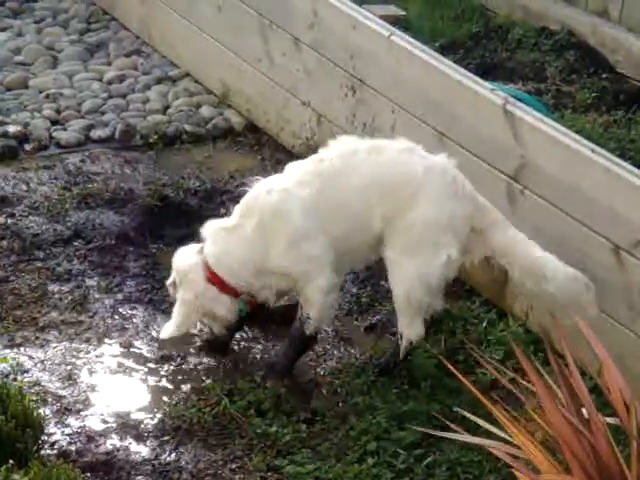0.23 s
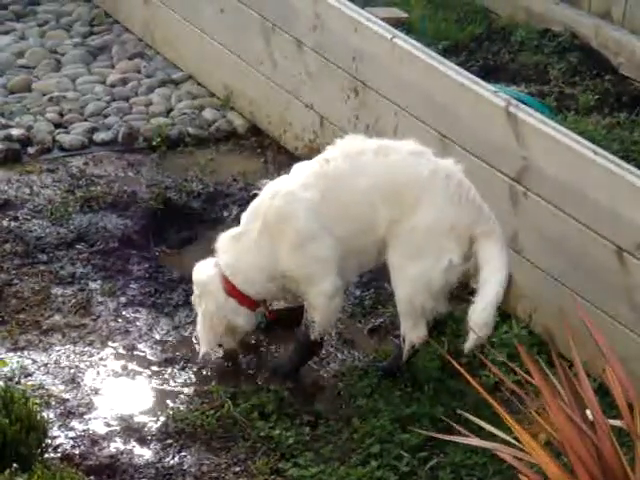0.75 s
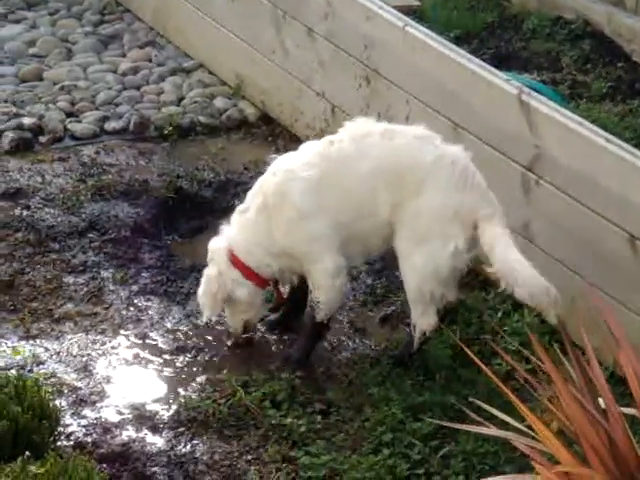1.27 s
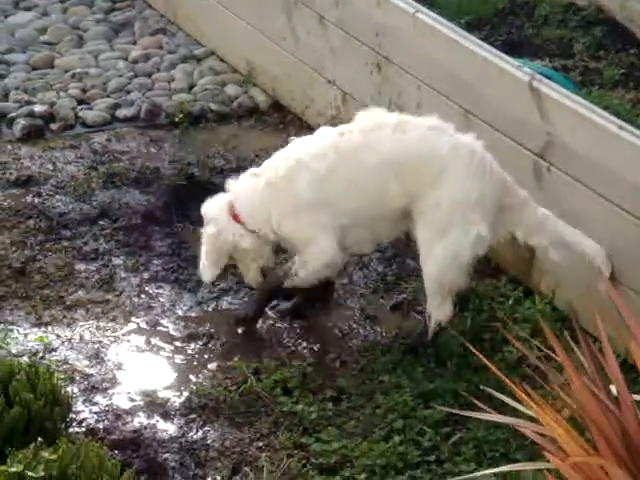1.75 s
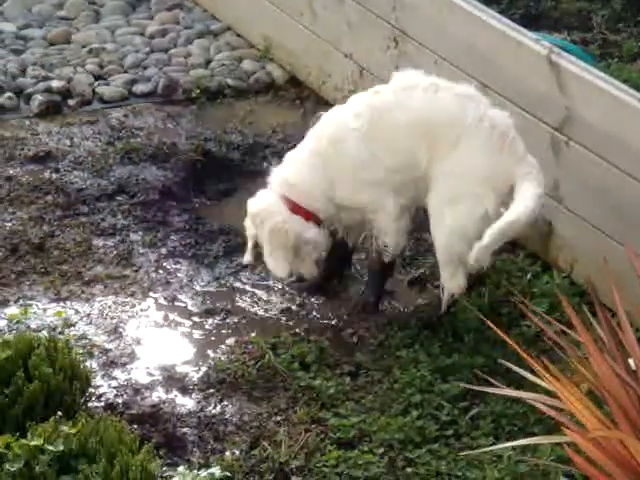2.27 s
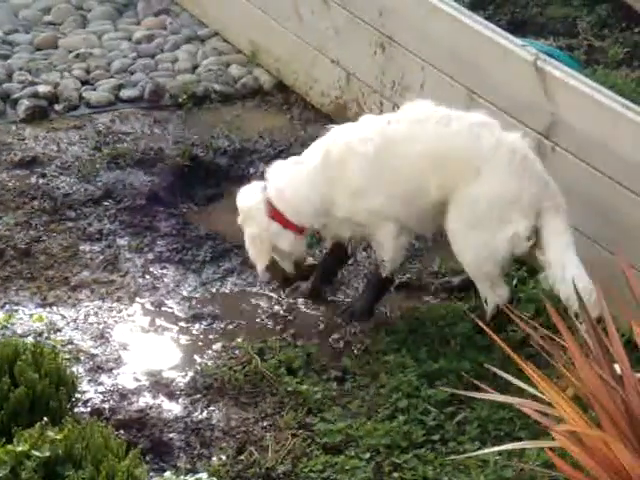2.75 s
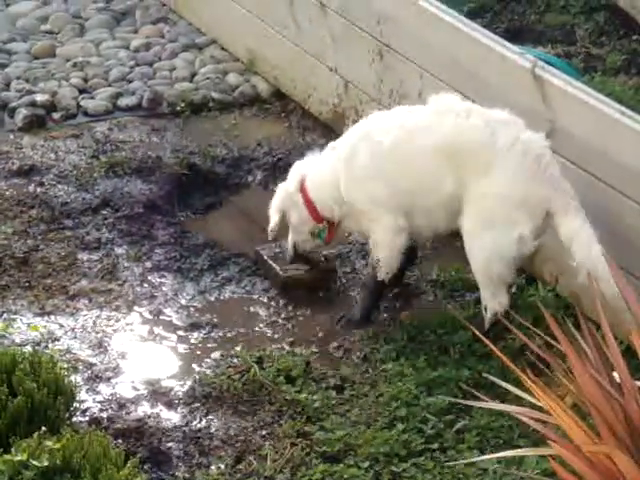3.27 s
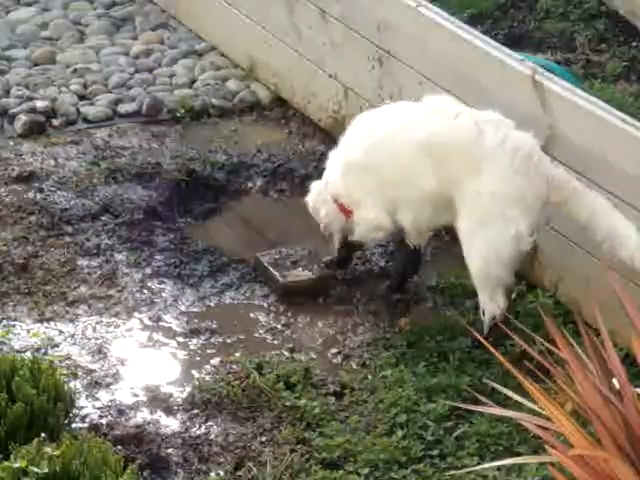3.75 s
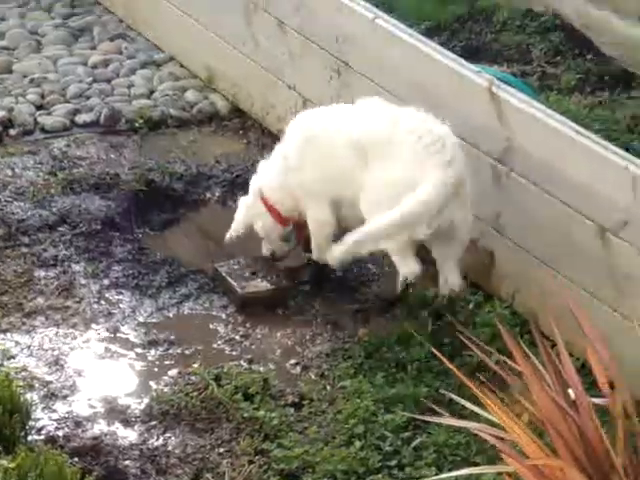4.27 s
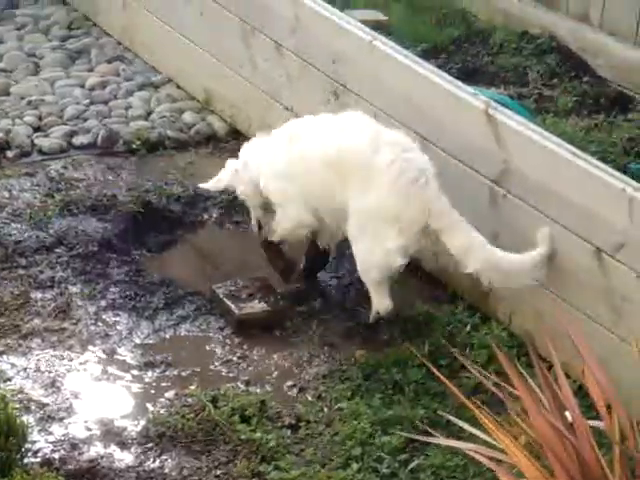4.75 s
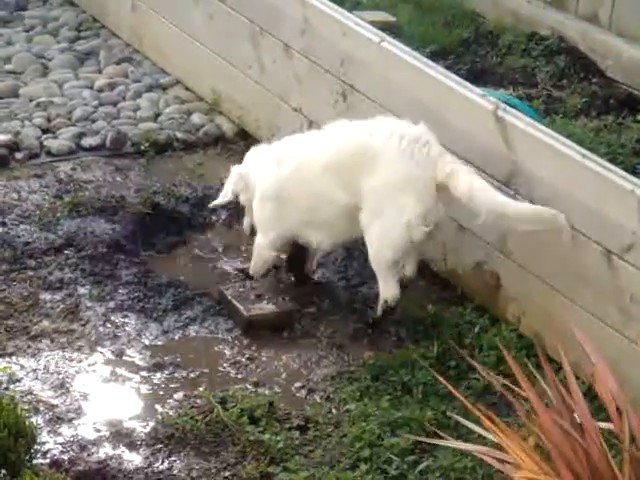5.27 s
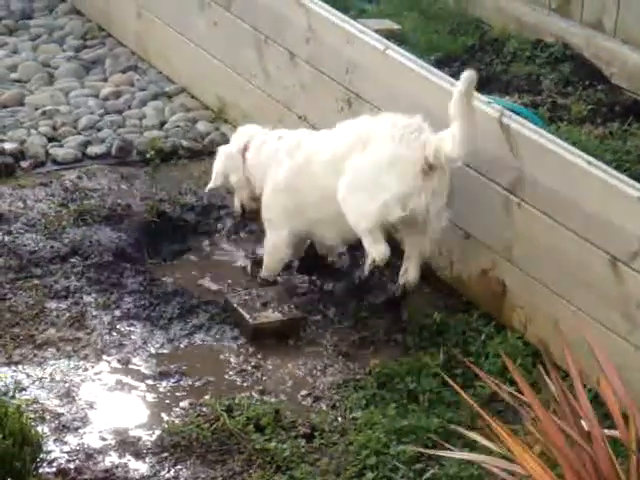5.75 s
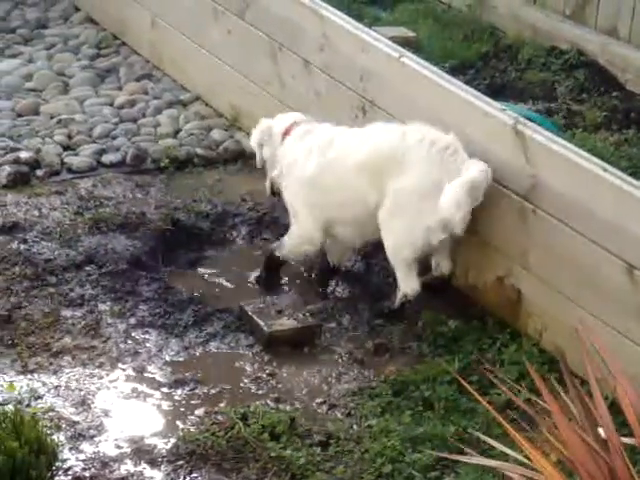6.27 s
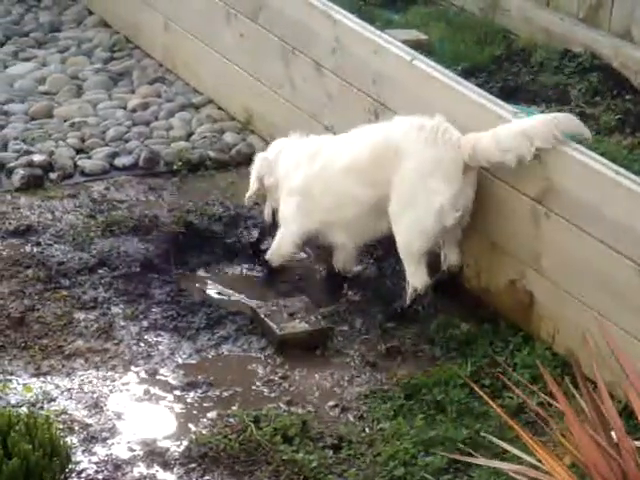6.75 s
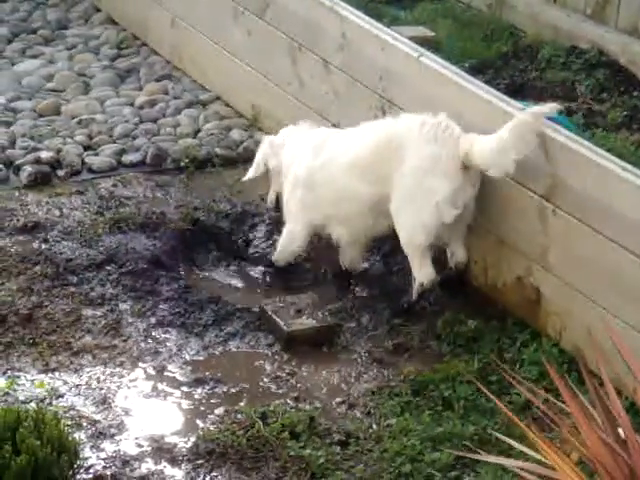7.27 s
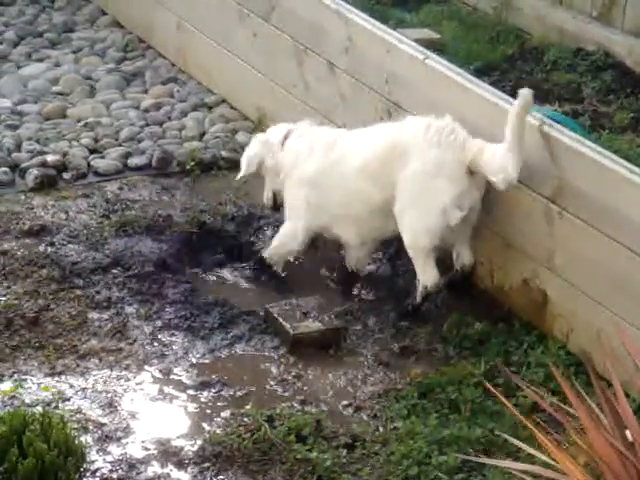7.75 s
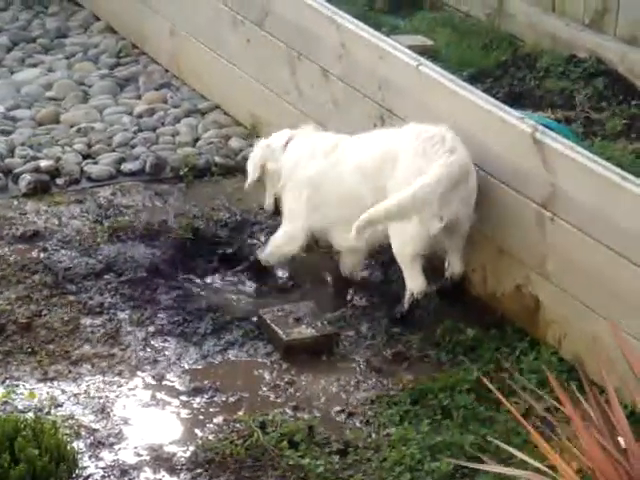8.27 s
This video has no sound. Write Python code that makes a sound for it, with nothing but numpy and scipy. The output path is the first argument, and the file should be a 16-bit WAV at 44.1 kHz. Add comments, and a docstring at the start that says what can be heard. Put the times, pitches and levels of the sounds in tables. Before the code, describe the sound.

A dog's paws slap and splash through a shallow muddy puddle, with spattering droplets, hollow wet plops and trickling water over a faint outdoor hush.

```python
"""Dog pawing a muddy puddle

A walled yard, the phone microphone a few metres from a dog that paws a shallow, muddy puddle.
Close in: slaps and spray of damped drop tones, ringing mud plops, bubbly churns, dull thuds; walls echo these.
Around them trickling water, filtered noise and tiny drops, swells with each slosh.
Behind: a noise hush of the neighbourhood, a mains hum, puffs of wind, fingers nudging the phone."""
import sys
import numpy as np
from scipy import signal
from scipy.fft import rfft, irfft, next_fast_len
from scipy.io import wavfile
from scipy.ndimage import uniform_filter1d, map_coordinates

SR = 44100
rng = np.random.default_rng(int(sys.argv[2]) if len(sys.argv) > 2 else 0)


def materialize(psi):
    """Save the field psi as 16-bit PCM at rate SR to the path in sys.argv[1].

    A 1-D psi becomes a single channel; in a 2-D psi each row is a channel.
    """
    bounded = np.clip(np.atleast_2d(psi).T, -1, 1)
    quanta = np.round(bounded * 32767).astype(np.int16)
    wavfile.write(sys.argv[1], SR, quanta)


N = 375726  # length in samples

# Colour of the far neighbourhood hush: [f/Hz, relative level per Hz/dB]
HUSH_SPECTRUM = [(35, -40), (60, -13.5), (324, 1), (619, 1.5), (720, 5), (1640, 0.5), (5150, -21),
                 (8830, -34.5), (9840, -14.5), (10500, -20.5), (22000, -120)]
# Colour of wind at the microphone: [f/Hz, relative level per Hz/dB]
WIND_SPECTRUM = [(15, -31.0), (30, -5), (80, -8.5), (200, -4.0), (500, -45.0)]
# Strength of the wind at the microphone: [t/s, level/dB]
WIND_LEVEL = [(0.0, -70.5), (0.92, -79), (2.77, -95), (3.25, -73), (3.51, -88), (6.59, -86), (6.86, -81),
              (7.6, -80), (8.52, -89)]
# Fingers nudging the phone: [t/s, level before damping/dB, f/Hz]
FINGER_BUMPS = [(.058, -49.5, 112), (7.141, -57, 80), (7.582, -50, 87)]
# Colour of the trickling water: [f/Hz, relative level per Hz/dB]
TRICKLE_SPECTRUM = [(880, -44.5), (1500, -8), (2760, -4.5), (3020, -2), (4050, -5.5), (9600, -1.5),
                    (10500, -25), (22000, -120)]
# Steady trickle under the swells: [t/s, level before flicker/dB]
TRICKLE_LEVEL = [(0.0, -50), (3.72, -52.5), (3.89, -51.5), (4.34, -52.5), (4.58, -50.5), (6.55, -52.5),
                 (7.14, -51), (8.52, -50.5)]
# Swells of stirred water: [t/s, gurgle level before shaping/dB, fizz level before shaping/dB]
SLOSHES = [(0.095, -41.5, -41.5), (0.265, -38, -50), (0.817, -64, -43.5), (1.013, -44, -50),
           (1.139, -56, -46), (1.18, -41.5, -47.5), (1.561, -50, -49.5), (1.929, -37.5, -59),
           (2.408, -44.5, -46), (2.546, -43, -48), (3.662, -53, -40.5), (3.835, -56, -40),
           (3.952, -57, -43), (3.993, -40, -45.5), (4.046, -43, -47.5), (4.576, -39.5, -40),
           (4.728, -42, -41.5), (5.298, -64, -42.5), (5.725, -44, -45.5), (5.785, -37, -40.5),
           (6.82, -43, -44.5), (7.361, -40, -42), (7.431, -35.5, -41), (7.572, -40.5, -42),
           (7.846, -39, -43), (8.108, -55, -42.5)]
# Paw slaps on thin water: [t/s, contact level before damping and filtering/dB, contact f/Hz]
PAW_SLAPS = [(0.374, -17.5, 8040), (0.4365, -14, 7530), (0.5659, -2.5, 5230), (0.622, -16, 6260),
             (0.736, -18.5, 8460), (0.92, -16.5, 6200), (1.868, -16.5, 7300), (2.05, -14.5, 8300),
             (2.093, -15, 6800), (2.2658, -11.5, 5180), (2.8303, -11.5, 4580), (3.0292, -18, 8360),
             (3.146, -14.5, 4800), (3.88, -14.5, 7700), (3.884, -17, 3580), (4.418, -15, 4750),
             (4.5166, -18, 4640), (4.845, -19, 7860), (4.881, -15.5, 6030), (4.981, -15.5, 3600),
             (5.121, -22, 4250), (5.238, -14.5, 8400), (5.425, -12, 2860), (5.4285, -12, 5070),
             (5.6018, -12.5, 4600), (5.9532, -12.5, 2800), (6.0592, -19, 2800), (6.062, -9.5, 5730),
             (6.519, -14.5, 4830), (6.556, -18.5, 1380), (7.1255, -9.5, 4240), (7.1293, -6.5, 5220),
             (7.191, -4.5, 6030), (7.223, -24.5, 7000), (7.2346, -11, 4640), (7.738, -8.5, 5600),
             (7.77, -10.5, 6550), (8.251, -7, 6900), (8.264, -13.5, 3660)]
# Air pockets in the mud: [t/s, level before sharing out and damping/dB, f/Hz, raggedness/0-1]
MUD_POCKETS = [(1.312, -36, 3270, 0.8), (1.567, -35.5, 3000, 0.15), (3.054, -31, 3060, 0.43),
               (3.91, -27.5, 2970, 0.4), (4.421, -31.5, 1730, 0.48), (5.237, -29, 2680, 0.32),
               (5.304, -30, 1720, 0.2), (5.425, -34.5, 1320, 0.4), (5.475, -29, 2030, 0.74),
               (5.59, -29.5, 1317, 0), (5.599, -29, 1300, 0.66), (5.608, -22, 2400, 0.45),
               (5.789, -33, 1285, 0.52), (5.954, -32, 1660, 0.78), (6.057, -29.5, 1090, 0.37),
               (6.069, -26, 660, 0.33), (6.508, -25, 2710, 0.22), (6.555, -31, 893, 0.7),
               (6.66, -33, 1390, 0.44), (7.138, -25.5, 1124, 0.37), (7.173, -19.5, 2800, 0.2),
               (7.256, -42, 796, 0.7), (7.2707, -14.5, 1787, 0.4), (7.365, -30.5, 806, 0.36),
               (7.39, -24.5, 1720, 0.15), (7.4205, -24.5, 663, 0), (7.428, -10, 813, 0.13),
               (7.442, -30.5, 2300, 0.84), (7.452, -24, 828, 0.47), (7.739, -29, 1053, 1),
               (7.847, -29.5, 2460, 0.06), (7.862, -23, 1225, 0.3), (8.003, -32.5, 724, 0.08),
               (8.417, -31.5, 820, 0.31), (8.475, -31.5, 1050, 0.93)]
# Water and mud pouring back after a deep stroke: [t/s, length/s, base bubble level/dB]
CHURNS = [(5.03, 0.075, -55.5), (5.43, .1, -57), (5.57, 0.11, -55.5), (5.78, 0.063, -66),
          (6.515, 0.095, -52.5), (7.13, .12, -47), (7.235, .12, -47), (7.41, .1, -48), (7.74, 0.15, -52.5),
          (8.4, .12, -54.5)]
# Paw landing in soft mud: [t/s, first lump level before damping/dB, first lump f/Hz]
MUD_THUDS = [(5.035, -48, 570), (5.455, -43.5, 538), (5.611, -36.5, 586), (6.068, -39, 321),
             (7.366, -42.5, 343), (7.402, -49, 305)]
# Echoes off the yard walls: [delay/s, level/dB]
WALL_ECHOES = [(.0079, -5.5), (.0158, -15), (0.025, -13), (.038, -17)]

HUSH_DB, HUM_DB = -56, -79  # mean levels, before slow wavering
SPLIT_HZ = 4000  # coarse gurgle below, fine fizz above
SWELL_RISE_S, SWELL_FADE_S = 0.0015, 0.02  # time constants of a slosh's power
RUNBACK_DB, RUNBACK_S = -34.5, 0.022  # water running back: level re slap, time constant of its power
LEAD_S, LEAD_DB_PER_S = 0.003, 5000  # how early the first drops may run ahead, how fast they swell
SPRAY_T60_S, SPRAY_DB = 0.026, -13  # 60 dB fade of the spray, base level of its drops re contact
THIN, BODY_DB = 0.7, -15.5  # high-pass as a share of slap pitch, level of the full-band body
CHURN_LOW_HZ, CHURN_HIGH_HZ = 645, 3780
EDGE_HZ, TOP_HZ = 10150, 11003  # where the phone's treble drops, where it ends


def amp(db):
    """Gain of a level in dB."""
    return 10 ** (np.asarray(db) / 20)


def unit(x):
    """x scaled to rms 1."""
    return x / np.sqrt(np.mean(x ** 2) + 1e-20)


def curve(rows):
    """One value per sample, joined by straight lines between (t/s, value) rows."""
    return np.interp(np.arange(N) / SR, *np.transpose(rows))


def wobble(rate):
    """A smooth random curve with `rate` knots a second."""
    knots = rng.standard_normal(int(N * rate / SR) + 4)
    return map_coordinates(knots, [np.arange(N) * rate / SR])


def filtered(x, response):
    """x shaped by a gain that depends on f/Hz."""
    m = next_fast_len(N + SR // 2)
    return irfft(rfft(x, m) * response(np.fft.rfftfreq(m, 1 / SR)), m)[:N]


def rush(spectrum, patchy_db):
    """Coloured noise of rms 1, its gain uneven in patches of time and frequency."""
    z = signal.stft(rng.standard_normal(N + 512), nperseg=512)[2]
    field = uniform_filter1d(rng.standard_normal(z.shape), size=10, axis=0)
    field = uniform_filter1d(field, size=3, axis=1)
    x = signal.istft(z * amp(patchy_db * unit(field)), nperseg=512)[1][:N]
    f, db = np.transpose(spectrum)
    return unit(filtered(x, lambda hz: amp(np.interp(np.log(hz + 1), np.log(f), db))))


def grains(s, hz, gain, cycles, rise, size):
    """Sum of damped sines that fall by 1/e in `cycles` cycles; a positive rise bends the pitch upward."""
    t = np.arange(size) / SR
    age = t * (hz / cycles)[:, None]  # in decay times
    phase = 2 * np.pi * hz[:, None] * t * (1 + rise * np.minimum(age, 3))
    wave = np.sin(phase) * np.exp(-age) * (1 - np.exp(-6 * age))
    at = np.round(s * SR).astype(int)[:, None] + np.arange(size)
    return np.bincount(at.ravel(), (gain[:, None] * wave).ravel(), N + SR)[:N]


def burst(s, db, hz, t60, spread, cycles, spatter_db, count):
    """Grain settings for a sharp contact amid drops of either sign that swell just before it, then die away."""
    late, sign, luck = rng.random((3, count))
    pitch = rng.standard_normal(count)
    pitch = spread * np.where(pitch < 0, 0.45, 1.3) * pitch  # scatters farther up than down
    late = t60 * 0.76 * late ** 1.6 - LEAD_S
    fade_db = np.maximum(60 * late / t60, -LEAD_DB_PER_S * late)
    gain = amp(db + spatter_db + 11.5 * luck ** 3 - fade_db) * np.where(sign < 0.5, -1, 1)
    late[0], pitch[0], gain[0] = 0, 0, amp(db)  # the contact itself
    return s + late, np.clip(hz * np.exp(pitch), 100, SR / 4), gain, np.full(count, cycles)


def yard():
    """Far hush, a wavering mains hum, low wind noise buffeting the microphone, fingers as damped low tones."""
    hum_level = np.sqrt(2) * amp(HUM_DB + 1.1 * wobble(4))
    hum = hum_level * np.sin(2 * np.pi * 100.1 * np.arange(N) / SR)
    buffet = rush(WIND_SPECTRUM, patchy_db=0.5)
    wind = amp(curve(WIND_LEVEL)) * unit(amp(3.3 * wobble(9.1)) * buffet)
    s, db, hz = np.transpose(FINGER_BUMPS)
    bumps = grains(s, hz, amp(db), np.full(len(s), 0.9), rise=0, size=4000)
    drift_db = 0.6 * wobble(2.6)
    hush = amp(HUSH_DB + drift_db) * rush(HUSH_SPECTRUM, patchy_db=2.02)
    return hush + hum + wind + bumps


def power_spikes(s, db):
    """One-sample impulses of power at the given times."""
    return np.bincount(np.round(s * SR).astype(int), amp(db) ** 2, N + 1)


def trickle():
    """Water gurgles and fizzes: hiss and tiny drops, freshened by sloshes that start fast and fade."""
    place, luck, life = rng.random((14000, 3)).T
    s = place * (N / SR)
    hz = 5200 * np.exp(0.34 * rng.standard_normal(len(s))).clip(0.55, 1.9)
    drops = grains(s, hz, amp(30 * luck ** 3), 0.85 + 5 * life, rise=0.027, size=200)
    water = unit(rush(TRICKLE_SPECTRUM, patchy_db=2.5) + 0.45 * unit(drops))
    gurgle = filtered(water, lambda f: 1 / (1 + (f / SPLIT_HZ) ** 6))
    fizz = water - gurgle

    t = np.arange(SR // 4) / SR
    swell = np.exp(-t / SWELL_FADE_S) * (1 - np.exp(-t / SWELL_RISE_S))
    slap_s, slap_db, _ = np.transpose(PAW_SLAPS)
    # water thrown up by a slap runs back for a while
    runback = signal.fftconvolve(power_spikes(slap_s, slap_db + RUNBACK_DB), np.exp(-t / RUNBACK_S))[:N]
    steady = amp(curve(TRICKLE_LEVEL)) ** 2 + runback
    slosh_s, gurgle_db, fizz_db = np.transpose(SLOSHES)
    out = np.zeros(N)
    for part, db, flicker_db in [(gurgle, gurgle_db, 1.3), (fizz, fizz_db, 3.2)]:
        power = steady + signal.fftconvolve(power_spikes(slosh_s, db), swell)[:N]
        out += np.sqrt(np.abs(power)) * amp(flicker_db * wobble(90)) * part
    return out


def slaps():
    """A paw breaks the surface with a crack and throws a spray of short drops; thin water has little bass."""
    out = np.zeros(N)
    for s, db, hz in PAW_SLAPS:
        drops = burst(s, db, hz, t60=SPRAY_T60_S, spread=0.59, cycles=1.05, spatter_db=SPRAY_DB, count=50)
        spray = grains(*drops, rise=0.003, size=220)
        start = round(s * SR)
        span = slice(start - SR // 50, start + SR // 8)
        highpass = signal.butter(4, THIN * hz, "high", fs=SR, output="sos")
        out[span] += signal.sosfilt(highpass, spray[span]) + amp(BODY_DB) * spray[span]
    return out


def plops():
    """An air pocket rings for some tens of cycles; a ragged one breaks into bubbles of scattered pitch."""
    out = np.zeros(N + SR)
    t = np.arange(SR // 4) / SR
    rows = []
    for s, db, hz, ragged in MUD_POCKETS:
        ragged = np.clip(ragged, 0.02, 0.98)
        fade = amp(-60 * t * hz / 45)  # 60 dB in 45 cycles
        ring = np.sin(2 * np.pi * hz * t * (1 + 0.18 * t)) * fade * (1 - np.exp(-t / 0.00044))
        out[round((s - 0.002) * SR):][:len(t)] += amp(db) * (1 - ragged) * ring
        rows.append(burst(s, db + 20 * np.log10(ragged), hz, t60=0.13, spread=0.424 * ragged,
                          cycles=3.05, spatter_db=-4.5, count=50))
    pockets = out[:N] + grains(*np.concatenate(rows, axis=1), rise=0.039, size=900)
    return signal.sosfilt(signal.butter(2, 560, "high", fs=SR, output="sos"), pockets)


def churn():
    """Mud and water pour back into the hole: a dense run of bubbles of many sizes, softer towards its end."""
    s, length, db = np.repeat(CHURNS, 160, axis=0).T  # 160 bubbles each
    late, luck, size, life = rng.random((len(s), 4)).T
    hz = CHURN_LOW_HZ * (CHURN_HIGH_HZ / CHURN_LOW_HZ) ** size
    gain = amp(db - 15 * late + 18 * luck ** 2)
    return grains(s + length * late, hz, gain, 2.3 + 4 * life, rise=0.051, size=500)


def thuds():
    """Soft mud gives way under a paw in a few low, damped lumps."""
    rows = [burst(s, db, hz, t60=0.22, spread=0.33, cycles=2.8, spatter_db=0.0, count=14)
            for s, db, hz in MUD_THUDS]
    return grains(*np.concatenate(rows, axis=1), rise=0.0059, size=3000)


def walls(x):
    """The near wall returns one clear copy, farther ones weaker copies in a short diffuse tail."""
    t = np.arange(SR // 4) / SR
    answer = amp(-42.0 - 60 * t / 0.46) * rng.standard_normal(len(t)) * (t > 0.004)
    answer[0] = 1  # direct sound
    for s, db in WALL_ECHOES:
        answer[round(s * SR)] += amp(db)
    return signal.fftconvolve(x, answer)[:N]


def scene():
    """Paw sounds echoed by the walls, over the trickle and the yard's background."""
    paws = slaps() + plops() + thuds() + churn()
    return (walls(paws) + trickle() + yard())[None]


def record(dry):
    """The phone drops its treble by 43 dB at an edge and keeps nothing above its band limit."""
    return filtered(dry[0], lambda hz: np.where(hz < EDGE_HZ, 1, amp(-43.0)) * (hz < TOP_HZ))[None]


dry = scene()
out = record(dry)
materialize(out)
```